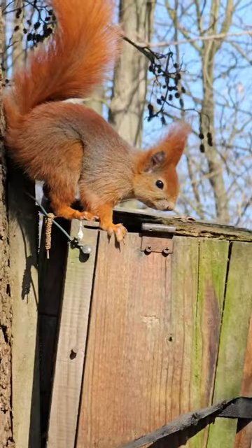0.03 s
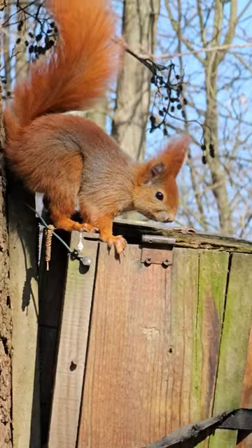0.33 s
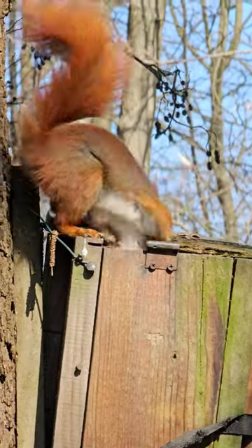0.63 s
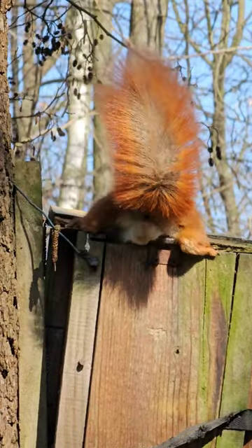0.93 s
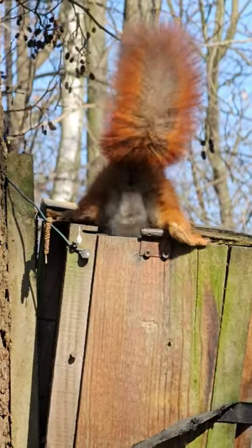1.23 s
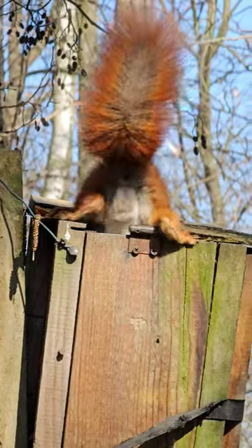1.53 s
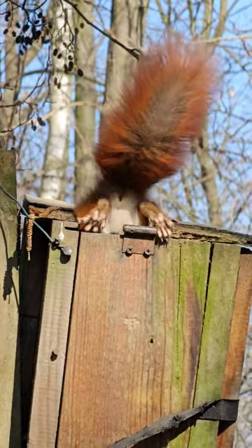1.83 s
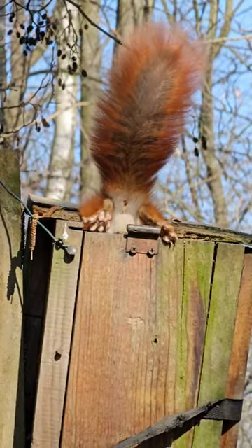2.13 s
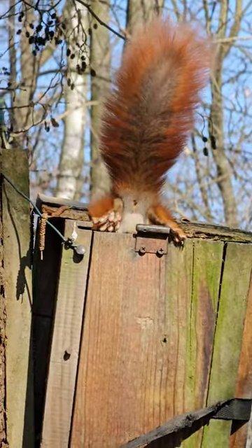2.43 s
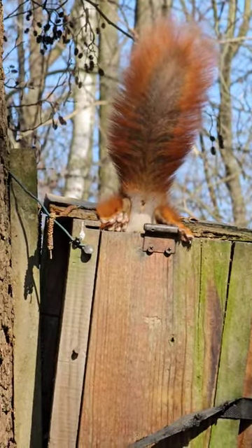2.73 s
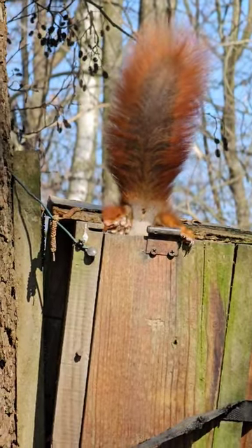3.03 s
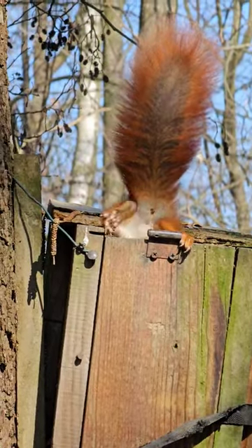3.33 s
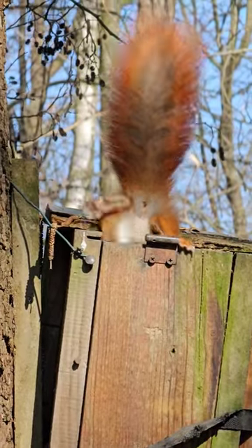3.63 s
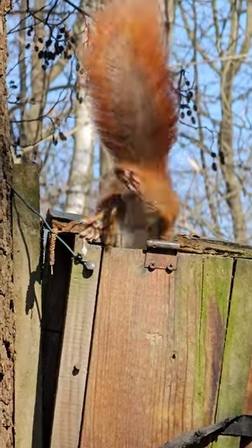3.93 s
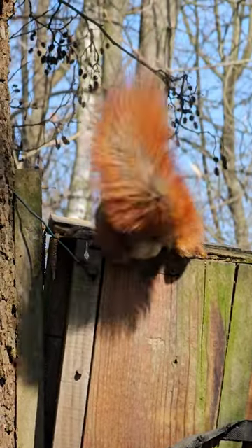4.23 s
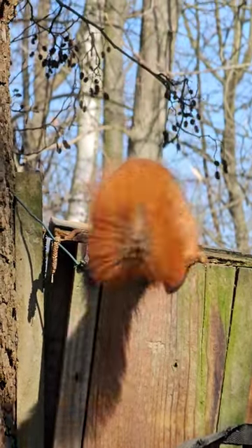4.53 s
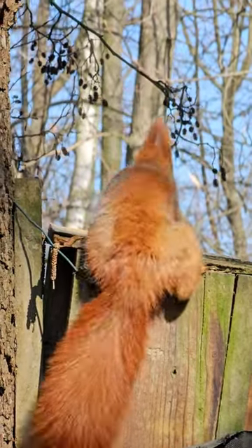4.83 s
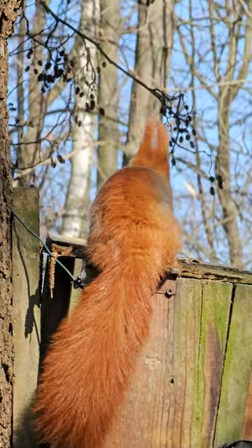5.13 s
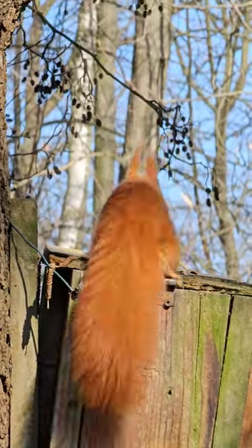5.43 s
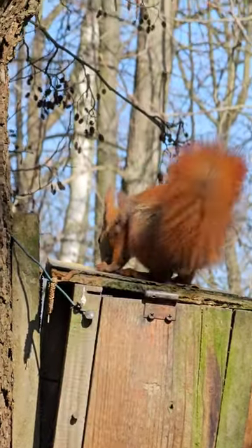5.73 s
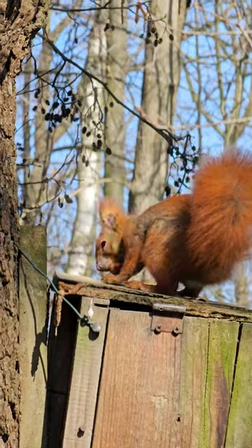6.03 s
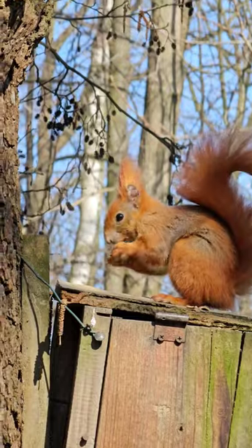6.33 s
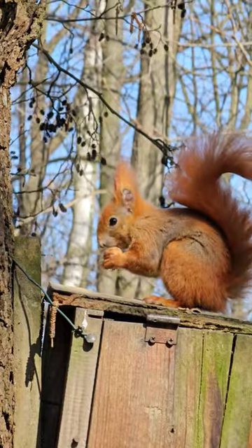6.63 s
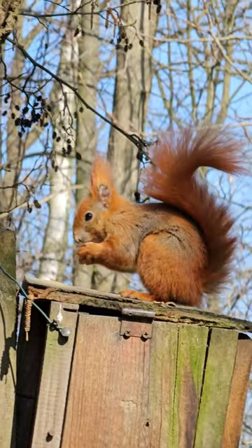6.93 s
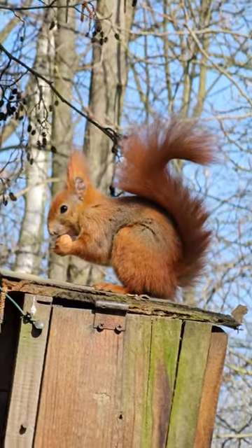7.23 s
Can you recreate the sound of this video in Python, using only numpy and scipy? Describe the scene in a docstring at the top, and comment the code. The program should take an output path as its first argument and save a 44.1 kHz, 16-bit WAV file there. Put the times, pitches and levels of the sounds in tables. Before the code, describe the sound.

A squirrel moves on a wooden feeder box close by, at the edge of a wood. Its claws make small, bright, dry ticks and short scrapes in uneven clusters throughout, busiest around 0.9, 1.7, 3.1 to 4.8 and 5.6 to 6.7 seconds. The box gives a short dull thud at about 0.9 seconds and softer ones near 4.1 and 5 seconds. At 2.4 seconds a seed shell snaps with a tiny sharp crack, followed at once by a faint dry rasp and a brief, faint, distant hoot around 2.6 seconds. Songbirds whistle and twitter quietly in the trees all along, most actively in the first two and a half seconds. Behind everything, distant traffic makes a gently swelling low rumble and a smooth tyre hush. Light wind bumps the left microphone with brief low puffs near 0.5, 1.4, 3.3, 4.9 and 7.2 seconds, strongest at 4.9.

```python
"""Squirrel at a wooden feeder

A squirrel climbs into a feeder box at the edge of a wood and comes out again to eat. Its claws
tick and scrape, making the boards ring; the box thuds as its weight shifts, and a seed shell snaps.
Songbirds whistle and twitter among the trees, and there is one dry rasp and one faint hoot.
Distant traffic rumbles and hushes behind it all, and light wind buffets the left microphone."""
import sys
import numpy as np
from scipy import signal
from scipy.fft import rfft, irfft
from scipy.io import wavfile
from scipy.ndimage import uniform_filter1d

SR = 44100
rng = np.random.default_rng(int(sys.argv[2]) if len(sys.argv) > 2 else 0)


def dump_mix(stems):
    """Bounce the given channels to the path in sys.argv[1] as a 16-bit WAV at rate SR."""
    frames = np.atleast_2d(stems).T  # one column per channel
    limited = np.clip(frames, -1, 1)  # hard clip at full scale
    pcm = np.round(limited * 32767).astype(np.int16)
    wavfile.write(sys.argv[1], SR, pcm)


N = 321930
TIME = np.arange(N) / SR
FREQS = np.arange(N // 2 + 1) * SR / N


def claw_ticks(contact_s, skid_s, spot_q):
    """Each claw bites with a dry crack, coloured by the spot it hits; its skid rings the boards."""
    # Claws landing on wood: (time [s], peak level [dB], brightest pitch [Hz], skid against peak [dB])
    footfalls = [(0.242, -43, 6200, -22), (.3041, -38, 7100, -24), (0.3182, -49, 7200, -22),
                 (0.372, -46, 5200, -24), (.6974, -44, 6400, -24), (0.868, -42, 6160, -4),
                 (.9056, -47, 9000, -24), (.945, -46, 7340, -16), (.954, -47, 7000, -20),
                 (0.9756, -42, 7900, -9), (1.0593, -51.5, 6200, -26), (1.4217, -49, 5800, -12),
                 (1.7253, -43, 5240, -4), (1.7528, -34, 6150, -3.5), (1.7599, -39, 6100, -14),
                 (1.9011, -47, 7160, -11), (2.029, -42, 8970, -22), (2.4999, -53, 5600, -18),
                 (2.5249, -49, 6200, -12), (2.762, -50, 6000, -18), (3.1087, -42.5, 5600, -3),
                 (3.2745, -38, 6200, -13), (3.4488, -50, 7550, -14), (3.4837, -47, 7400, -16),
                 (3.5445, -36.5, 5580, -9), (3.5541, -36, 5640, -20), (3.7757, -47.5, 7150, -12),
                 (3.929, -45, 6500, -7), (4.0818, -39, 7840, -7), (4.0881, -40, 7600, -9),
                 (4.158, -50, 10400, -20), (4.3256, -41, 7550, -10), (4.759, -38, 6800, -6.5),
                 (4.79, -41, 7500, -9), (4.972, -57, 7000, -8), (5.415, -55, 7060, -7),
                 (5.5846, -41.5, 11500, -14), (5.6877, -45.5, 6440, -14), (5.6928, -48, 7000, -13),
                 (5.8036, -49.5, 7420, -18), (5.9092, -41, 8500, -16), (5.9137, -43, 7070, -9),
                 (5.9555, -47, 8000, -20), (5.991, -40, 6840, -16), (6.1318, -51, 7000, -12),
                 (6.1582, -46, 7500, -4), (6.272, -40, 6900, -21), (6.3428, -45, 5600, -24),
                 (6.6656, -46, 7000, -16), (6.6783, -39.5, 7100, -10)]
    t = TIME[:SR // 25]
    bite = t / contact_s * np.exp(1 - t / contact_s)
    skid = (1 - np.exp(-t / contact_s)) * np.exp(-t / skid_s)
    rubbing = unit(board_ring(rng.standard_normal((2, N)), crack_db=-14.5))
    treble_band = signal.butter(2, [4200, 9700], "band", fs=SR)
    cracks, skids = np.zeros(N), np.zeros((2, N))
    for s, db, hz, skid_db in footfalls:
        spot = signal.iirpeak(hz, spot_q, fs=SR)  # a higher q gives a narrower peak
        burst = signal.lfilter(*treble_band, bite * rng.standard_normal(len(t)))
        crack = signal.lfilter(*spot, burst)
        add(cracks, s, undb(db) * crack / np.abs(crack).max())
        rub = signal.lfilter(*spot, rubbing[:, int(s * SR):][:, :len(t)])
        add(skids, s, undb(db + skid_db) * skid * unit(rub))
    return from_feeder(cracks) + skids


def claw_scrapes(slips_per_s, catches_per_s, catch_db, rest_db):
    """Claws make many tiny slips over the wood grain, with a harder catch now and then."""
    sound = 0
    for stiffness in (.93, 1, 1.06):  # softer and stiffer spots of the wood
        slips = rng.random(N) < slips_per_s / SR
        catches = (rng.random(N) < catches_per_s / SR) * undb(catch_db)
        force = (slips + catches) * rng.standard_normal((2, N)) * undb(5 * wander(40))
        sound = sound + board_ring(force, crack_db=-17.5, stiffness=stiffness)
    sound = unit(sound)
    body = shape(sound, 1 / (1 + (FREQS / 8700) ** 20))  # the part below 8700 Hz
    treble = sound - body
    body_gain, treble_gain = drag_pressure() + undb(rest_db)
    return body * body_gain + treble * treble_gain


def drag_pressure():
    """Each drag swells for a third of its length, then fades; gives a body gain and a treble gain."""
    # Claws dragging on the boards: (start [s], length [s], relative level [dB], extra treble [dB])
    drags = [(0.102, 0.18, -61, 3), (0.216, 0.19, -58, 2), (0.574, 0.1, -59, -6), (0.848, 0.072, -54.5, -3),
             (0.916, .11, -61, 2), (1.705, 0.054, -51, -17), (1.734, 0.04, -48, -2),
             (1.825, 0.29, -65.5, -3), (2.238, 0.17, -66.5, 5), (2.51, 0.066, -58.5, -10),
             (3.268, 0.015, -45, -13), (3.47, 0.055, -59.5, -9), (3.541, 0.026, -45, -4),
             (3.55, 0.012, -38, 1), (3.761, 0.023, -56, -2), (3.905, 0.074, -60, -3), (4.02, 0.15, -68, 10),
             (4.076, 0.021, -54, 4), (4.293, .12, -54.5, -4), (4.728, 0.065, -53, -2),
             (4.79, 0.072, -64, 1), (4.89, 0.21, -61.5, -10), (5.575, 0.032, -56.5, 5),
             (5.675, 0.063, -58, 0), (5.895, 0.061, -53.5, -1.5), (5.958, 0.1, -63, 0),
             (6.105, 0.12, -56.5, 0), (6.216, 0.16, -60, 0), (6.584, .11, -62.5, -6),
             (6.64, 0.075, -59, -1), (6.92, .37, -72, 7.5)]
    pressure = np.zeros((2, N))
    for s, length, db, treble_db in drags:
        progress = np.linspace(0, 1, int(length * SR))
        envelope = np.interp(progress, [0, .33, 1], [0, 1, 0]) ** 0.75
        add(pressure, s, undb([[db], [db + treble_db]]) * envelope)
    return pressure


def board_ring(force, crack_db, stiffness=1):
    """A force makes the boards ring, higher at a stiffer spot, along with a bright crack."""
    # Ringing tones of the dry boards: (pitch [Hz], relative level [dB], time to fade by 60 dB [s])
    modes = [(3260, 3, .014), (5430, 11, 0.021), (6170, 12.5, 0.037), (7400, 11, 0.014), (7170, 7, 0.02),
             (8800, -3, 0.0092), (12200, -6.5, 0.0014), (14600, -14, .005)]
    ring = sum(undb(db) * resonance(hz * stiffness, np.log(1000) / np.pi / t60) for hz, db, t60 in modes)
    crack = undb(crack_db) * resonance(7600, 11000)
    low_cut = FREQS ** 4 / (FREQS ** 4 + 3000 ** 4)
    return shape(force, (ring + crack) * low_cut)


def shell_snap(at_s, rise_s, level_db):
    """A seed shell breaks inside the box: a tiny burst of force makes it ring."""
    # Ringing tones of the shell: (pitch [Hz], half width [Hz], relative level [dB])
    modes = [(4800, 1200, -27), (7540, 510, -8), (8370, 970, -10), (9100, 600, 1), (13300, 1300, -20)]
    t = TIME[:SR // 50]
    force = np.zeros(N)
    add(force, at_s, t / rise_s * np.exp(-t / rise_s) * rng.standard_normal(len(t)))
    crack = shape(force, sum(undb(db) * resonance(hz, 2 * half) ** 2 for hz, half, db in modes))
    strength = np.sqrt(np.sum(crack ** 2) / (SR // 1000))  # as if packed into one millisecond
    return from_feeder(undb(level_db) * crack / strength)


def box_knocks(hz, t60):
    """The whole box gives a dull, short thud as the squirrel shifts its weight."""
    # Thuds of the box: (time [s], peak level [dB])
    thuds = [(0.945, -18.5), (4.073, -30), (5.013, -26.5)]
    out, t = np.zeros(N), TIME[:SR // 4]
    for s, db in thuds:
        add(out, s, np.sin(2 * np.pi * hz * t) * undb(db - 60 * t / t60))
    return out


def near_birds(trill_hz, trill_depth, flicker_db, scatter):
    """Pure songbird notes arrive straight; rough ones trill, flicker and are scattered by the trees."""
    # Bird notes: (start [s], length [s], first pitch [Hz], last pitch [Hz],
    # glide done by half way [share], relative level [dB], roughness [0 = pure])
    notes = [(0.17, 0.084, 5200, 3800, 0.68, -55, 0.1), (0.176, 0.049, 5950, 6340, 0.6, -60, 0.3),
             (0.244, 0.125, 3860, 4950, 0.68, -57, 0.12), (0.382, 0.032, 5100, 5020, 0.46, -58.5, 0.54),
             (.436, .034, 4060, 3030, 0.62, -51.5, 0.26), (0.571, 0.036, 6100, 5620, 0.38, -62, 0.2),
             (0.591, 0.014, 3700, 3520, .5, -48.5, 0.63), (0.612, 0.022, 3100, 3000, 0.51, -48.5, 0.02),
             (0.708, 0.027, 6500, 4550, 0.54, -54, 0.42), (0.744, 0.027, 4030, 2940, 0.55, -49, 0.44),
             (0.865, 0.11, 5060, 3200, 0.83, -56.5, 0.33), (1.205, 0.027, 6340, 6800, 0.34, -59.5, 0.2),
             (1.39, 0.12, 5580, 4140, 0.65, -59.5, 1.1), (1.476, 0.087, 3670, 2940, 0.58, -55, .8),
             (1.638, 0.039, 4240, 3630, 0.44, -57.5, 0.94), (1.781, 0.042, 3910, 4200, 0.66, -54.5, .5),
             (1.812, 0.11, 4280, 4050, 0.45, -64, 0.17), (1.91, 0.016, 2980, 4100, 0.35, -54, 0.5),
             (1.945, 0.015, 3920, 3170, 0.46, -57, 0.5), (2.015, 0.012, 3200, 4140, 0.61, -59, .4),
             (2.135, .02, 3150, 3650, 0.6, -62, 0.35), (2.21, 0.16, 6670, 3950, 0.61, -57, 0.5),
             (2.245, 0.052, 4250, 4750, 0.55, -65, .07), (2.275, .16, 4920, 4760, 0.44, -58, 0.03),
             (2.914, .055, 7900, 6500, 0.81, -62.5, 0.3), (3.098, 0.048, 8260, 6560, 0.92, -54, 0.24),
             (3.198, 0.044, 3440, 3590, 0.38, -51.5, 0.96), (3.647, 0.02, 3000, 3100, 0.55, -53, 0.4),
             (3.732, .025, 3510, 3670, .5, -60, 0.16), (3.949, 0.0185, 4030, 4830, 0.61, -50.5, 0.23),
             (4.299, .034, 4560, 4320, 0.7, -47, .06), (4.314, 0.074, 4360, 4300, 0.82, -49.5, .05),
             (4.847, 0.073, 7200, 6070, 0.73, -67, .07), (4.923, .036, 3000, 3970, 0.37, -57, 0.34),
             (4.97, .04, 4200, 3730, 0.45, -62, 0.55), (5.622, 0.033, 3920, 4640, 0.61, -61, 0.25),
             (5.964, 0.031, 4100, 4650, 0.6, -58, 0.2), (6.009, 0.029, 4600, 3650, 0.51, -57, 0.28),
             (6.2, 0.033, 4050, 4630, 0.65, -62, 0.3), (6.258, 0.036, 4330, 4420, .5, -57, 0.25),
             (6.418, 0.024, 3400, 4180, 0.66, -64, .45), (6.525, 0.047, 5200, 4500, 0.63, -58, 0.5),
             (6.565, .017, 3330, 3600, .5, -57, .35), (6.938, .025, 3070, 5120, 0.42, -62, .36)]
    direct, scattered = np.zeros((2, N)), np.zeros((2, N))
    trill = .7 * np.sin(2 * np.pi * trill_hz * TIME) + wander(400)
    flicker = flicker_db * wander(130)
    for s, length, start_hz, end_hz, bend, db, rough in notes:
        start = int(s * SR)
        pitches_hz = start_hz, start_hz + bend * (end_hz - start_hz), end_hz
        note = whistle(length, pitches_hz, trill_depth * rough * trill[start:])
        note *= undb(db + min(5 * rough, 1) * flicker[start:start + len(note)])
        share = min(scatter * rough, 1)
        add(direct, s, (1 - share) * note)
        add(scattered, s, share * note)
    blurred = tree_echo(undb(-4) * scattered, t60=0.23, echo_db=4.5)
    return tree_echo(direct, t60=.3, echo_db=-15) + blurred


def far_birds(low_hz, high_hz, glide, count):
    """Short, quivering chirps come at random from deeper in the wood."""
    out = np.zeros(N)
    quiver = .07 * wander(300)
    for when, pitch, length, faintness, *bends in rng.random((count, 7)):
        centre_hz = low_hz * (high_hz / low_hz) ** (pitch ** 2)
        pitches_hz = centre_hz * (1 + glide * (np.array(bends) - .5))
        chirp = whistle(.015 + .035 * length, pitches_hz, quiver)
        add(out, when * N / SR, undb(-6 * faintness) * chirp)
    return np.array([out, out])


def whistle(length_s, pitches_hz, wobble):
    """One bird note arches through three pitches; wobble bends it by a fraction of the pitch."""
    progress = np.linspace(0, 1, int(length_s * SR))
    arch_hz = np.polyval(np.polyfit([0, .5, 1], pitches_hz, 2), progress)
    phase = 2 * np.pi * np.cumsum(arch_hz * (1 + wobble[:len(progress)])) / SR
    envelope = np.abs(np.sin(np.pi * progress)) ** (2 / 3)
    return 2 * envelope * np.sin(phase)


def dry_rasp(start_s, rate_hz, jitter, level_db):
    """Quick, uneven pulses of noise pass through a few bright resonances."""
    # Resonances of the rasp: (pitch [Hz], width [Hz], relative level [dB])
    peaks = [(3400, 1500, 0), (4760, 2400, 2), (5700, 1100, -4)]
    phase = np.cumsum(rate_hz * (1 + jitter * wander(66))) / SR % 1
    pulses = rng.standard_normal((2, N)) * np.exp(-phase / 0.9)
    colour = sum(undb(db) * resonance(hz, width) ** 2 for hz, width, db in peaks)
    high_cut = 1 / (1 + (FREQS / 7200) ** 10)
    envelope = np.interp(TIME, start_s + np.cumsum([0, .13, .075, .03]), [0, 1, 1, 0])  # rise, hold, fade
    return unit(shape(pulses, colour * high_cut)) * undb(level_db) * envelope


def far_hoot(middle_s, half_length_s):
    """A short, blurred call from far away: two narrow bands of noise swell and fade together."""
    # Tones of the hoot: (pitch [Hz], width [Hz], level [dB])
    bands = [(593, 22, -43), (908, 98, -39)]
    tones = sum(undb(db) * unit(shape(rng.standard_normal(N), resonance(hz, width) ** 2))
                for hz, width, db in bands)
    return tones * np.exp(-2 * ((TIME - middle_s) / half_length_s) ** 2)


def wind_puffs(right_db, spread):
    """A swirl of air passing the left microphone pushes its membrane in, then sucks it out."""
    # Puffs of wind: (middle time [s], level [dB], pitch [Hz])
    puffs = [(0.471, -6.5, 77), (1.409, -4.5, 95), (1.44, -9.5, 88), (3.332, -7.5, 80), (3.597, -14, 128),
             (3.722, -13, 75), (4.879, -8.5, 81.6), (4.909, -1, 78.4), (5.6, -12, 64.7), (7.164, -4, 64.6),
             (7.208, -7.5, 72)]
    out, t = np.zeros(N), TIME[:SR // 10] - 1 / 20
    for s, db, hz in puffs:
        phase = 2 * np.pi * hz * t
        add(out, s + t[0], -undb(db) * np.sin(phase) / (1 + (phase / spread) ** 4))
    return np.array([out, undb(right_db) * out])


def traffic_rumble(drone_hz, width_hz, drone_db, waver_db):
    """Far engines and moving air make a swelling rumble that holds a drone and the octave above it."""
    # Tone colour of the rumble: (frequency [Hz], relative level [dB])
    spectrum = [(20, -18.5), (35, -12.5), (50, -3), (70, -3), (90, -7.5), (125, -11), (170, -16),
                (250, -21.5), (330, -37), (600, -81.5)]
    # Slow swell of the rumble: (time [s], relative level [dB])
    swell = [(.1, -30.5), (.7, -24.5), (1.7, -26), (2.5, -30.5), (4.1, -26), (5.3, -25.5), (6.2, -25),
             (7.3, -28)]
    # The drone's octave coming and going: (time [s], relative level [dB])
    octave_swell = [(1.8, -49), (2.4, -37.5), (3.6, -38.5), (4.7, -43), (5.4, -49.5)]
    drone_boost = 1 + undb(drone_db) * np.abs(resonance(drone_hz, width_hz))
    noise = outdoor_noise(undb(over_hz(spectrum)) * drone_boost)
    # Even out the noise's own ups and downs before giving it the swell.
    steady = noise / np.sqrt(uniform_filter1d(noise.mean(axis=0) ** 2, size=SR // 7))
    octave = outdoor_noise(resonance(2 * drone_hz, 2 * width_hz) ** 2) * undb(over_time(octave_swell))
    return steady * undb(over_time(swell) + waver_db * wander(8.6)) + octave


def tyre_hush(flutter_db):
    """Tyres on a distant road make a smooth hush that flutters slightly."""
    # Tone colour of the tyres: (frequency [Hz], relative level [dB])
    spectrum = [(100, 1), (240, 5), (320, -2), (420, -6), (600, -3.5), (850, -0.5), (1300, -2.5),
                (1700, -10.5), (2500, -23), (3600, -36), (5000, -45.5), (7500, -46.5), (9300, -50.5),
                (10400, -64.5), (11600, -63.5), (16000, -62)]
    # Slow swell of the hush: (time [s], relative level [dB])
    swell = [(0.1, -38.5), (1.2, -38), (2.6, -38.5), (4.5, -37.5), (7.3, -39)]
    return outdoor_noise(undb(over_hz(spectrum))) * undb(over_time(swell) + flutter_db * wander(23))


def outdoor_noise(gain):
    """Noise from all round is alike at both microphones in the bass and unrelated in the treble."""
    # How alike left and right are: (frequency [Hz], correlation [0 to 1])
    likeness = [(30, 0.85), (70, 0.79), (150, 0.99), (300, 0.95), (700, 0.8), (1400, 0.72), (2500, 0.11),
                (5000, 0.029)]
    alike = over_hz(likeness)
    mid = shape(rng.standard_normal(N), gain * np.sqrt(1 + alike))
    side = shape(rng.standard_normal(N), gain * np.sqrt(1 - alike))
    return np.array([mid + side, mid - side]) / mid.std()


def tree_echo(x, t60, echo_db):
    """Trunks add a thin echo, different on each side, that fades by 60 dB in t60 seconds."""
    t = TIME[:SR]
    tail = rng.standard_normal((2, SR)) * undb(-60 * t / t60) * (1 - np.exp(-t / 0.0051))
    tail /= np.sqrt(np.sum(tail ** 2, axis=1, keepdims=True))
    return x + undb(echo_db) * signal.fftconvolve(x, tail, axes=1)[:, :N]


def from_feeder(x, lag_s=.00002):
    """Sound from the feeder reaches the left microphone a little later than the right."""
    return np.array([shape(x, np.exp(-2j * np.pi * FREQS * lag_s)), x])


def undb(db):
    """Turn decibels into a gain."""
    return 10 ** (np.asarray(db) / 20)


def unit(x):
    """Scale to an average strength (rms) of 1."""
    return x / np.sqrt(np.mean(x ** 2))


def over_time(rows):
    """Join (time [s], value) rows by straight lines."""
    return np.interp(TIME, *np.transpose(rows))


def over_hz(rows):
    """Join (frequency [Hz], value) rows on a log-frequency axis."""
    hz, value = np.transpose(rows)
    return np.interp(np.log(FREQS + 1), np.log(hz), value)


def shape(x, gain):
    """Filter with one gain for each frequency."""
    return irfft(rfft(x) * gain, N)


def resonance(hz, width_hz):
    """Gains of one ringing peak, 1 at its centre."""
    return 1j * FREQS * width_hz / (hz ** 2 - FREQS ** 2 + 1j * FREQS * width_hz)


def wander(rate_hz):
    """Smooth random motion with a typical size of 1."""
    return unit(shape(rng.standard_normal(N), np.exp(-(FREQS / rate_hz) ** 2)))


def add(out, s, sound):
    """Mix a short sound in at s seconds."""
    start = max(int(s * SR), 0)
    part = out[..., start:start + sound.shape[-1]]
    part += sound[..., :part.shape[-1]]


def scene():
    """Mix the squirrel near by, the birds in the trees, the wind and the road."""
    ticks = claw_ticks(contact_s=.0005, skid_s=.006, spot_q=1.8)
    scrapes = undb(-3.5) * claw_scrapes(slips_per_s=680, catches_per_s=22, catch_db=4, rest_db=-71.5)
    claws = tree_echo(ticks + scrapes, t60=0.075, echo_db=-11)
    snap = shell_snap(at_s=2.3928, rise_s=0.00034, level_db=-32.5)
    squirrel = claws + snap + box_knocks(hz=254, t60=0.052)
    song = undb(-6) * near_birds(trill_hz=176, trill_depth=0.083, flicker_db=2, scatter=1.5)
    chirps = undb(-76.5) * far_birds(low_hz=2685, high_hz=4530, glide=0.22, count=210)
    twitter = tree_echo(chirps, t60=0.15, echo_db=5.5)
    rasp = tree_echo(dry_rasp(start_s=2.51, rate_hz=54, jitter=0.27, level_db=-57), t60=0.28, echo_db=-5.5)
    rumble = undb(2) * traffic_rumble(drone_hz=70.5, width_hz=8.2, drone_db=6, waver_db=2.5)
    hoot = far_hoot(middle_s=2.6, half_length_s=0.058)
    wind = wind_puffs(right_db=-28.5, spread=2.35)
    hush = undb(1.71) * tyre_hush(flutter_db=0.91)
    return squirrel + song + twitter + rasp + hoot + wind + rumble + hush


def record(dry):
    """Each microphone has its own colour; the sound opens after a short silence and its top is cut."""
    # Balance of the two microphones: (frequency [Hz], left minus right [dB])
    balance = [(40, 1.5), (100, 1), (380, -1), (700, 2.5), (1300, -1), (2600, 3.5), (4400, 1.5),
               (5400, -3.5), (6300, -9.5), (7600, -9), (9500, -0.5), (11000, -7), (15000, -7)]
    start_s, fade_s, top_hz = .115, .006, 15800
    tilt_db = over_hz(balance) / 2
    fade = np.clip(np.minimum(TIME - start_s, TIME[-1] - TIME) / fade_s, 0, 1)
    heard = shape(dry * fade, undb([tilt_db, -tilt_db]))
    return signal.sosfilt(signal.ellip(10, .2, 80, top_hz, fs=SR, output="sos"), heard)


dry = scene()
out = record(dry)
dump_mix(out)
```